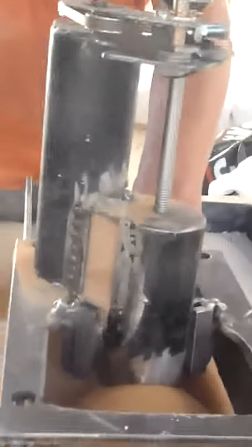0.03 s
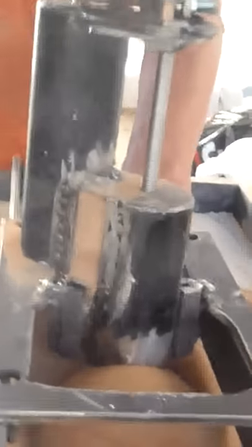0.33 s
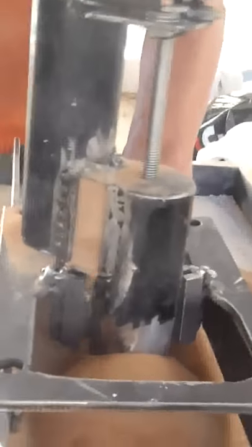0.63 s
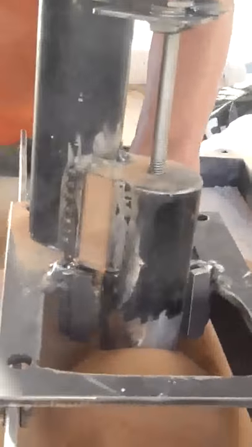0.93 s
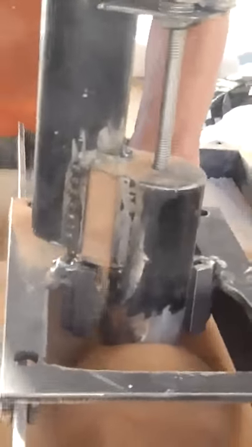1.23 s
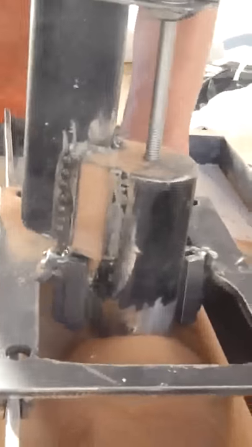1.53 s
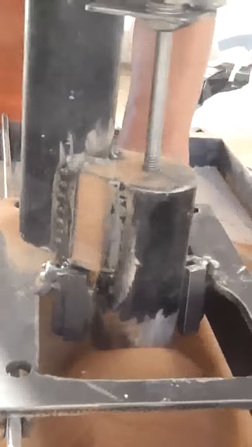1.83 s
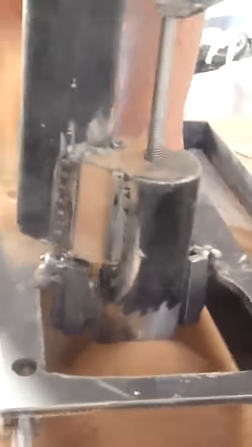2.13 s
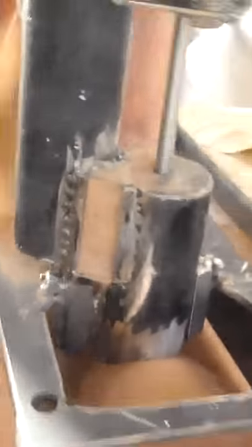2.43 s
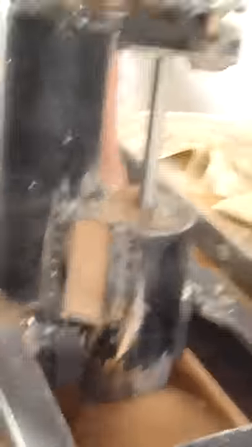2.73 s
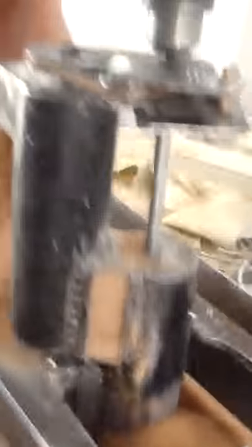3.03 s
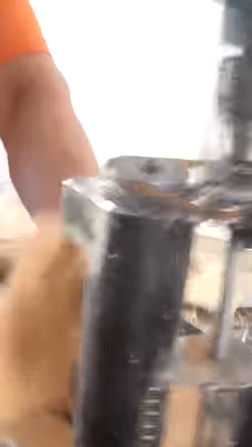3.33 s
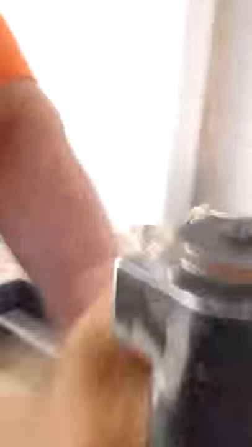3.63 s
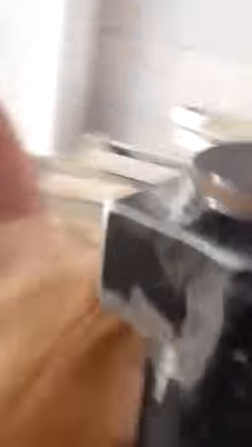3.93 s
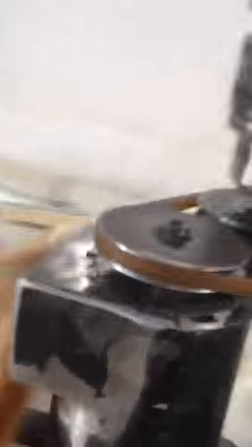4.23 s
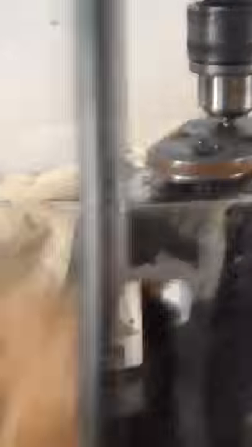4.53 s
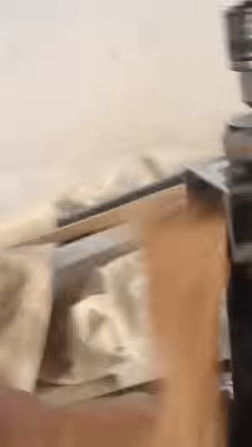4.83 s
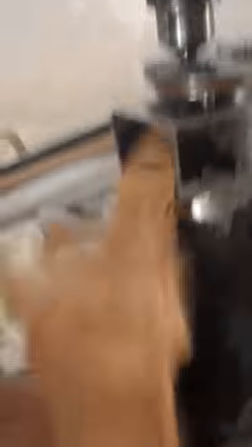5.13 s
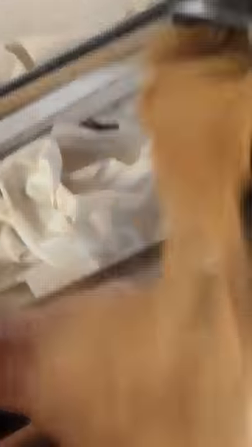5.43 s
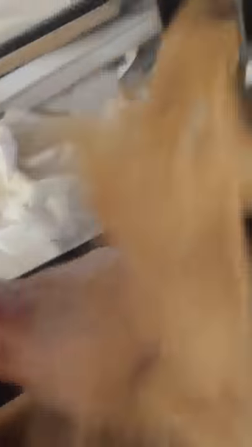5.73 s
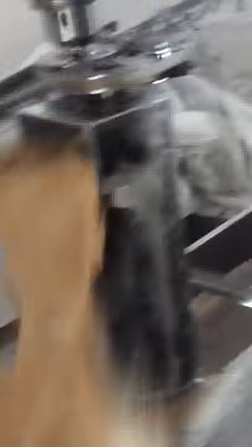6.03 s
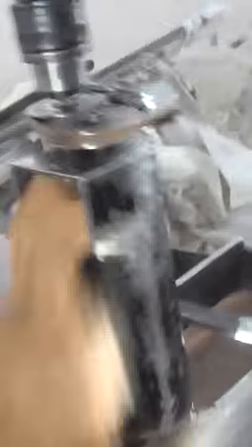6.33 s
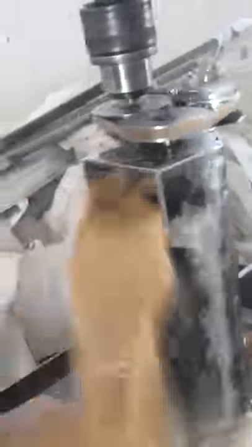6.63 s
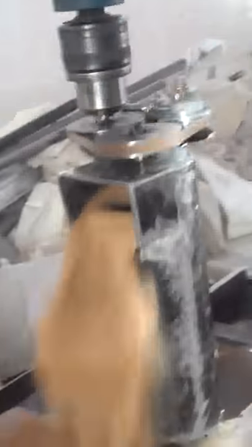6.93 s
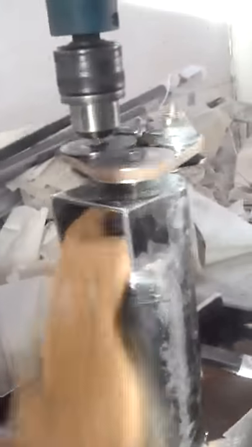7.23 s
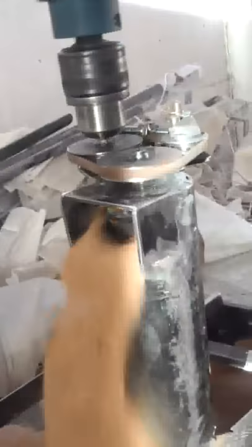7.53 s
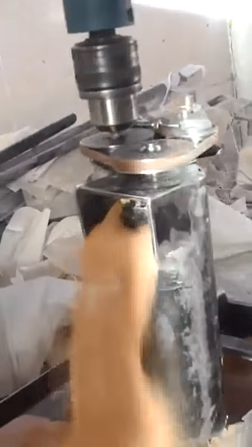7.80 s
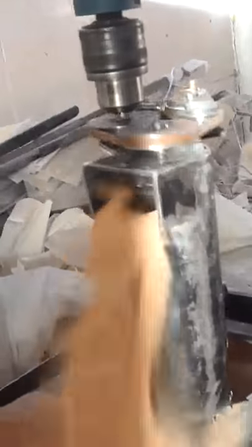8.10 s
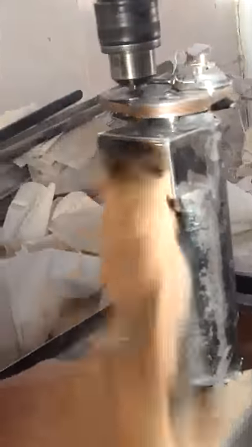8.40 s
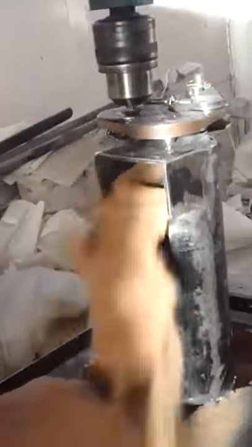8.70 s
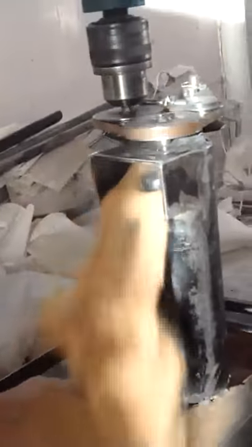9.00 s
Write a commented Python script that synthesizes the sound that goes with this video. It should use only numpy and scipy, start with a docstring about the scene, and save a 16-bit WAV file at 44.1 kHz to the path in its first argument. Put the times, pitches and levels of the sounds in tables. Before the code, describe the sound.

Close, gritty grinding and rhythmic squeaky scraping of a steel screw turning in a tube, as sand rumbles through and pours out.

```python
"""Sand auger in a workshop

An electric drill turns a steel screw that lifts sand up a square tube, close by in a small room.
Grit grinds in the steel, the screw scrapes the tube and squeals once a turn, loose metal clacks,
sand rumbles in the tube and hisses out of the spout. The hand-held microphone moves round the
machine, from hopper to spout, and is bumped a few times."""
import sys
import numpy as np
from scipy import signal
from scipy.fft import rfft, irfft
from scipy.io import wavfile
from scipy.ndimage import uniform_filter1d

SR = 44100
rng = np.random.default_rng(int(sys.argv[2]) if len(sys.argv) > 2 else 0)


def materialize(psi):
    """Save the field psi as 16-bit PCM at rate SR to the path in sys.argv[1].

    A 1-D psi becomes a single channel; in a 2-D psi each row is a channel.
    """
    bounded = np.clip(np.atleast_2d(psi).T, -1, 1)
    quanta = np.round(bounded * 32767).astype(np.int16)
    wavfile.write(sys.argv[1], SR, quanta)


N = 403956
TIME_S = np.arange(N) / SR
ROOM_T60_S, CUTOFF_HZ = 0.15, 14250
START_TURNS, PINCH_TURNS, SQUEAL_TURNS = .27, .57, .74  # screw angle past the scrape

# Screw speed, sagging under load (time [s], speed [turns/s])
SCREW_SPEED = [(0.0, 6.351), (0.6, 6.442), (0.8, 5.723), (1.8, 5.388), (2.0, 6.77), (2.8, 7.74),
               (4.0, 8.587), (4.8, 8.559), (5.6, 8.11), (5.8, 8.955), (6.4, 8.554), (7.4, 6.911),
               (7.6, 8.01), (7.8, 7.437), (8.6, 7.38), (9.16, 7.81)]
# Microphone's climb from hopper to spout (time [s], spout share [0-1])
SPOUT_SHARE = [(2.8, 0.011), (6.9, 0.67), (7.6, 0.96)]
# Machine from the moving microphone (time [s], rumble [dB], tube resonance [Hz], pouring [dB])
PERSPECTIVE = [(0, -28.5, 874.5, -30.5), (2.6, -28.5, 858, -34), (3.2, -31, 852, -38),
               (3.7, -34.5, 850, -39.5), (4.35, -38, 851, -39.5), (4.7, -33.5, 807, -35),
               (5.5, -28.5, 815, -45), (6.5, -28.5, 831, -34.5), (7.5, -28, 781.6, -31.5),
               (9.16, -28, 817, -34.5)]
# Grit between screw and casing (time [s], level [dB], rise at pinch [dB], rise at scrape [dB])
GRIT_LOAD = [(0, -19.1, 1.3, 3), (1.3, -17, 1.1, -2.5), (2.2, -17, 2, 0), (2.8, -16.5, 0, -1.5),
             (3.4, -20.5, 1.5, 0.5), (4.1, -23, -2.5, 1.5), (4.4, -18.5, -0.7, -1), (4.9, -23.5, 5, 14),
             (5.4, -16.5, 0.5, -1.5), (5.9, -19.5, 2.2, 4), (6.6, -20, 2.1, 4.5), (9.16, -15.5, -1, -3.5)]
# Screw runs free for a moment (time [s], grinding drop [dB])
FREE_RUNS = [(.46, 4.5), (1.48, 2.5), (1.685, 7), (2.53, 6.5), (3.35, -2), (3.698, 10), (3.87, 4),
             (4.075, 2.5), (4.29, 6), (4.415, 7), (5.05, 4.5), (5.745, 5.5), (8.51, 5)]

# Curves (time [s], relative level [dB])
DRAUGHT_LEVEL = [(0, -56), (3, -53), (3.5, -45), (5.4, -44.5), (5.75, -43), (6.5, -49.5), (9.16, -63)]  # air at the microphone
RUB_LEVEL = [(0, -19), (.7, -23), (1.6, -24.5), (2.25, -25), (2.45, -17.5), (3, -28), (3.3, -21),
             (3.65, -30.5), (4.4, -30.5), (4.8, -21), (6, -20), (7.3, -21.5), (9.16, -23)]  # screw on the tube wall
SQUEAL_LEVEL = [(0, -26), (.9, -18.5), (2, -19), (2.8, -20), (3.5, -33), (3.85, -42), (7.2, -28),
                (8.2, -21), (9.16, -22.5)]  # dry steel stick-slip

# Events (time [s], relative level [dB])
MIC_BUMPS = [(3.477, -25.5), (3.502, -36), (3.588, -28.5), (3.675, -28), (3.992, -23), (4.057, -31),
             (4.075, -26), (4.159, -30), (4.191, -21), (5.723, -32)]
METAL_CLACKS = [(0.908, -5), (1.363, -4), (1.907, -14), (2.875, -12), (6.809, -13)]
SCREW_BINDS = [(.271, -25), (1.275, -25), (1.373, -23.5), (4.971, -23.5), (6.616, -26.5), (6.868, -22),
               (7.412, -23.5), (7.545, -18.5), (8.48, -24.5), (8.614, -19), (8.882, -20.5), (9.008, -21.5)]  # harder, longer scrapes
GRAIN_CRUNCHES = [(.039, -21), (.738, -21), (1.085, -24.5), (1.658, -23), (1.726, -23.5), (2.135, -23),
                  (2.499, -17.5), (2.756, -24), (2.875, -22), (3.019, -24.5), (3.401, -22.5), (3.65, -26.5),
                  (3.765, -22.5), (3.991, -23.5), (4.47, -24.5), (5.278, -22.5), (5.449, -21.5),
                  (5.556, -19), (6.039, -19), (7.557, -20.5)]  # largest grains

# Broad spectra (frequency [Hz], relative gain [dB])
SAND_SPECTRUM = [(150, -20), (800, 6), (5000, -6), (8000, -16), (10000, -15), (14000, -18)]
TUBE_SPECTRUM = [(40, -16.5), (150, -14), (270, -7.5), (420, -3), (600, -2.5), (1020, -8.5), (1350, 2.5),
                 (2100, 1.5), (2600, -10), (4000, 2.5), (12000, -36.5)]
SCRAPE_SPECTRUM = [(100, -14.5), (350, -0.5), (750, 2.5), (1800, 5), (2600, -1.5), (4600, 5),
                   (10000, -24.5), (14000, -19)]
STEEL_SPECTRUM = [(300, -29.5), (1000, -10), (2600, -7), (3300, -7.5), (4450, 3), (5300, 6), (5800, -3),
                  (7100, -7.5), (7900, -16), (8800, -17), (9600, -26), (11200, -29), (12200, -21.5),
                  (14200, -34)]

# Resonances (frequency [Hz], width [Hz], relative gain [dB])
HOPPER_END_MODES = [(102, 8.1, 14), (173, 33, 14.5), (222, 37, -1), (286.5, 17.5, 6.5), (560, 65, -2.5),
                    (3420, 56, 3)]  # frame, heard from below
SPOUT_END_MODES = [(106, 28, 7.5), (176, 16, 10.2), (303.6, 6, 12.8), (338, 21, 9.9), (521, 13, 6.1),
                   (659, 13, 11), (1770, 105, 0.5), (3190, 85, 10.2)]  # frame, heard from above
WALL_MODES = [(1247, 130, 0.5), (1702, 83, 5.5), (2094, 130, -1), (3360, 150, 4)]
CASING_MODES = [(3750, 130, -15), (4370, 140, -10.5), (4630, 110, -13), (5100, 210, -8), (8580, 120, -25)]
CRACK_MODES = [(3040, 320, 4.9)]  # steel rung by hard grains


def from_db(db):
    return 10 ** (np.asarray(db) / 20)


def unit_rms(x):
    return x / np.sqrt(np.mean(x ** 2) + 1e-20)


def curves(table):
    """Each value column, interpolated per sample."""
    times_s, *columns = np.transpose(table)
    return [np.interp(TIME_S, times_s, column) for column in columns]


def impulses(events):
    """One click per (time [s], level [dB]) row."""
    clicks = np.zeros(N)
    for time_s, db in events:
        clicks[int(time_s * SR)] = from_db(db)
    return clicks


def swells(times_s, heights, width_s):
    """Gaussian bell round each time; area = height * width."""
    peaks = np.zeros(N)
    peaks[(np.asarray(times_s) * SR).astype(int)] = heights
    t = np.arange(-SR // 2, SR // 2) / SR
    return np.abs(signal.fftconvolve(peaks, np.exp(-np.pi * (t / width_s) ** 2), "same"))


def drift(rate_hz):
    """Smooth random wander, rms 1."""
    r = np.exp(-40 * np.pi * rate_hz / SR)
    slow = signal.lfilter([1], [1, -2 * r, r * r], rng.standard_normal(N // 20 + 4002))[4000:]
    return np.interp(np.arange(N) / 20, np.arange(len(slow)), unit_rms(slow))


def flutter(rate_hz, span_s=0.046):
    """Soft-limited wander that evens out over span_s, rms 1."""
    wander = drift(rate_hz)
    quick = wander - uniform_filter1d(wander, int(span_s * SR))
    return unit_rms(np.tanh(.5 * unit_rms(quick)))


def band_noise(low_hz, high_hz):
    """Band-passed noise, rms 1."""
    band = signal.butter(2, [low_hz, high_hz], "band", fs=SR, output="sos")
    return unit_rms(signal.sosfilt(band, rng.standard_normal(N)))


def grains(per_s, spread_db):
    """Random clicks of uneven size, rms 1."""
    sizes = from_db(spread_db * np.minimum(rng.exponential(1, N), 4)) * rng.choice([-1, 1], N)
    return unit_rms(sizes * (rng.random(N) < per_s / SR))


def resonance(x, hz, width_hz):
    """Two-pole resonator, peak gain 1."""
    r = np.exp(-np.pi * width_hz / SR)
    feedback = [1, -2 * r * np.cos(2 * np.pi * hz / SR), r * r]
    return signal.lfilter(np.array([1, 0, -1]) * (1 - r * r) / 2, feedback, x + 1e-18)


def moving_resonance(x, hz, width_hz):
    """Resonator whose centre follows a curve."""
    carrier = np.exp(2j * np.pi * np.cumsum(hz) / SR)
    r = np.exp(-np.pi * width_hz / SR)
    return 2 * np.real(carrier * signal.lfilter([1 - r], [1, -r], x / carrier + 1e-18))


def body(x, spectrum, modes=(), size=8192):
    """Causal unit-power filter: broad spectrum plus ringing modes."""
    hz, db = np.transpose(spectrum)
    bins_hz = np.linspace(1, SR / 2, size // 2 + 1)
    magnitude = from_db(np.interp(np.log(bins_hz), np.log(hz), db))
    cepstrum = irfft(np.log(magnitude))
    response = irfft(np.exp(rfft(2 * cepstrum[:size // 2], size)))  # minimum phase
    response += sum(from_db(gain_db) * resonance(response, mode_hz, width_hz)
                    for mode_hz, width_hz, gain_db in modes)
    return signal.oaconvolve(x, response / np.linalg.norm(response))[:N]


def screw_turns():
    """Running screw angle."""
    return START_TURNS + np.cumsum(curves(SCREW_SPEED)[0]) / SR


def pass_times_s(place_turns):
    """When the screw passes a given place in its turn."""
    turns = screw_turns()
    passes = np.arange(np.ceil(turns[0] - place_turns), turns[-1] - place_turns) + place_turns
    return np.interp(passes, turns, TIME_S)


def workshop(x, wet_db=-13, size=16384):
    """Short wall reflections; the pattern shifts as the microphone moves."""
    t = np.arange(size) / SR
    tails = rng.standard_normal((4, size)) * from_db(-60 * t / ROOM_T60_S) * (t > .004)
    weights = np.array([drift(0.87) for _ in tails])
    weights /= np.linalg.norm(weights, axis=0)
    reflections = sum(weight * signal.oaconvolve(x, tail / np.linalg.norm(tail))[:N]
                      for weight, tail in zip(weights, tails))
    return x + from_db(wet_db) * reflections


def handling(thud_hz=85, width_hz=110, rustle_db=-10, rustle_s=0.032):
    """Dull microphone bumps, each with a finger rub, over a low draught."""
    thuds = resonance(impulses(MIC_BUMPS), thud_hz, width_hz) * SR / (np.pi * width_hz)
    thuds = signal.sosfilt(signal.butter(2, 260, fs=SR, output="sos"), thuds)
    draught = from_db(curves(DRAUGHT_LEVEL)[0]) * band_noise(15, 60)
    times_s, bump_db = np.transpose(MIC_BUMPS)
    rustle = swells(times_s, from_db(bump_db + rustle_db), rustle_s) * band_noise(40, 220)
    return from_db(1.5) * thuds + rustle + draught


def pouring(level_db, flicker_db=3.5):
    """Sand hiss of countless tiny impacts, its level flickering at random."""
    flicker = from_db(level_db + flicker_db * drift(20.5))
    return flicker * body(grains(per_s=20000, spread_db=0.5), SAND_SPECTRUM)


def rumbling(level_db, tube_hz, churn_db=3.0):
    """Sand tumbles in the tube and shakes the frame's modes."""
    at_spout = curves(SPOUT_SHARE)[0]
    churn = from_db(level_db + churn_db * flutter(41))
    rumble = 0
    for share, modes in [(1 - at_spout, HOPPER_END_MODES), (at_spout, SPOUT_END_MODES)]:
        impacts = grains(per_s=6000, spread_db=2.0) * churn
        rumble += body(impacts * np.sqrt(share), TUBE_SPECTRUM, modes)
    return rumble + from_db(-6) * moving_resonance(rumble, tube_hz, width_hz=90)


def clacking(rattle_s=0.0014):
    """Loose steel parts knock: hard contact, instant rebounds."""
    decay = signal.lfilter([1], [1, -np.exp(-1 / (rattle_s * SR))], impulses(METAL_CLACKS) + 1e-18)
    return from_db(2.5) * body(decay * rng.choice([-1, 1], N), STEEL_SPECTRUM)


def squealing(low_hz=4980, rise_hz=340, length_s=0.033, lag_turns=0.0797, casing_db=-11):
    """Dry steel sticks and slips once a turn; pitch rises with grip and the casing rings."""
    times_s = pass_times_s(SQUEAL_TURNS)
    level_db = np.interp(times_s, *np.transpose(SQUEAL_LEVEL))
    envelope = swells(times_s, from_db(level_db), length_s)
    grip = np.cos(np.pi * (screw_turns() - SQUEAL_TURNS - lag_turns)) ** 2
    pitch_hz = low_hz + rise_hz * grip + 72 * drift(170)
    stutter = from_db(5 * flutter(70))
    note = unit_rms(np.sin(2 * np.pi * np.cumsum(pitch_hz) / SR) * stutter)
    slips = rng.standard_normal(N)
    overtones = unit_rms(resonance(slips, 8770, 110) + from_db(-5) * resonance(slips, 9400, 110))
    casing = from_db(casing_db) * unit_rms(resonance(slips, 3520, 70))
    return envelope * (note + casing + from_db(-20) * overtones)


def wall_pressure(stroke_s=.0165, bind_s=0.036, spread_db=2):
    """Screw on tube: one short stroke a turn, more where it binds; summed in power."""
    times_s = pass_times_s(0)
    rub_db = np.interp(times_s, *np.transpose(RUB_LEVEL))
    rub_db += spread_db * rng.standard_normal(len(times_s))
    strokes = swells(times_s, from_db(rub_db) ** 2, stroke_s)
    bind_times_s, bind_db = np.transpose(SCREW_BINDS)
    binds = swells(bind_times_s, from_db(bind_db) ** 2, bind_s)
    return np.sqrt(strokes + binds)


def scraping(tube_hz, judder_db=2.0, overtone_ratio=2.14, grit_db=-2.5):
    """The screw slips on the wall and cracks grit; pressed hard, the tube sings two rough notes."""
    spout_weight = curves(SPOUT_SHARE)[0] ** 2
    pressure = wall_pressure()
    slips = unit_rms(grains(per_s=7000, spread_db=2.5) * from_db(judder_db * flutter(110)))
    rasp = body(slips * pressure, SCRAPE_SPECTRUM, WALL_MODES)
    rasp += spout_weight * resonance(rasp, 615, 160)  # at the spout, clatter displaces the low note
    cracks = grains(per_s=1500, spread_db=3.0) * pressure
    grit = from_db(grit_db) * body(cracks, STEEL_SPECTRUM, CRACK_MODES)
    phase = 2 * np.pi * np.cumsum(tube_hz + 26 * drift(45)) / SR
    low_note = np.sin(phase) * from_db(-.5 - 5 * spout_weight + 2.5 * flutter(50))
    high_note = np.sin(overtone_ratio * phase) * from_db(-5.5 + 2.5 * flutter(50))
    singing = pressure * np.tanh(pressure / from_db(-22))
    return from_db(1.1) * rasp + grit + singing * (low_note + high_note)


def crumbs(grind_db, chance=.25, offset_db=-7.5, spread_db=1.9, scatter_s=.01):
    """Small grains caught at random near scrape or pinch: (time [s], level [dB])."""
    times_s = np.concatenate([pass_times_s(0), pass_times_s(PINCH_TURNS)])
    scatter, size = rng.standard_normal((len(times_s), 2)).T
    level_db = np.interp(times_s, TIME_S, grind_db) + offset_db + spread_db * size
    caught = rng.random(len(times_s)) < chance
    return np.column_stack([times_s + scatter_s * scatter, level_db])[caught]


def crunching(grind_db, rise_s=0.013, fall_s=0.0051):
    """Pressure builds on a grain until it crumbles in a short burst."""
    bursts = np.zeros(N)
    for time_s, db in [*GRAIN_CRUNCHES, *crumbs(grind_db)]:
        near = np.abs(TIME_S - time_s) < .1
        t = TIME_S[near] - time_s
        bursts[near] += from_db(db) * np.exp(-np.maximum(-t / rise_s, t / fall_s))
    return from_db(8.5) * body(bursts * grains(per_s=12000, spread_db=-2.0), STEEL_SPECTRUM)


def grit_load_db(waver_db=1.0, squeeze_turns=0.51):
    """Grinding level: swings at each pinch and scrape, wavers, drops when the screw runs free."""
    level_db, pinch_db, scrape_db = curves(GRIT_LOAD)
    turns = screw_turns()
    pinch = np.cos(2 * np.pi * (turns - PINCH_TURNS))
    squeeze = np.exp(-np.pi * ((turns - np.round(turns)) / squeeze_turns) ** 2)
    waver = flutter(12.2, span_s=0.063)
    slack_db = swells(*np.transpose(FREE_RUNS), width_s=0.063)
    return level_db + pinch_db * pinch + scrape_db * squeeze + waver_db * waver - slack_db


def grinding(level_db, chatter_db=2.5, chatter_hz=90):
    """Grit is crushed in quick clusters; the wandering contact favours one steel mode, then another."""
    chatter = unit_rms(from_db(chatter_db * flutter(chatter_hz)))
    crush = body(grains(per_s=7000, spread_db=2.5) * chatter, STEEL_SPECTRUM)
    ringing = 0
    for hz, width_hz, db in CASING_MODES:
        coupling = from_db(6 * flutter(45))
        drive = rng.standard_normal(N) * chatter * coupling
        ringing += from_db(db) * unit_rms(resonance(drive, hz, width_hz))
    return from_db(level_db - 5.0) * (crush + ringing)


def scene(rumble_follow=0.82, stream_follow=.35):
    """Machine in its room, plus handling; rumble and stream follow quick swings of the grinding."""
    grind_db = grit_load_db()
    rumble_db, tube_hz, sand_db = curves(PERSPECTIVE)
    swing_db = grind_db - uniform_filter1d(grind_db, SR // 2)
    steel = grinding(grind_db) + crunching(grind_db) + clacking() + squealing()
    tube = rumbling(rumble_db + rumble_follow * swing_db, tube_hz) + scraping(tube_hz)
    stream = pouring(sand_db + stream_follow * swing_db)
    return (workshop(steel + tube + stream) + handling())[None]


def record(dry):
    """Soft clip, then steep low-pass."""
    rounded = 1.364 * np.tanh(dry / 1.655)
    return signal.sosfilt(signal.ellip(12, .1, 90, CUTOFF_HZ, fs=SR, output="sos"), rounded)


dry = scene()
out = record(dry)
materialize(out)
```